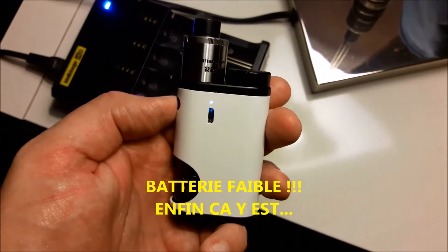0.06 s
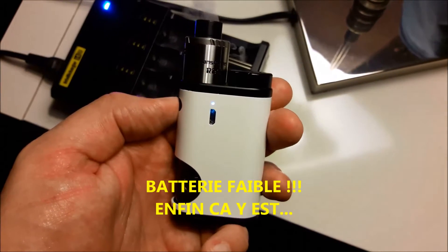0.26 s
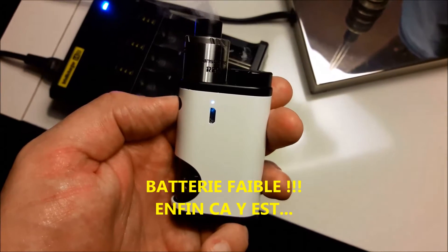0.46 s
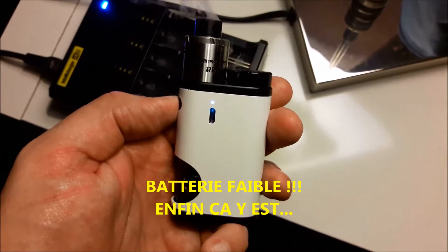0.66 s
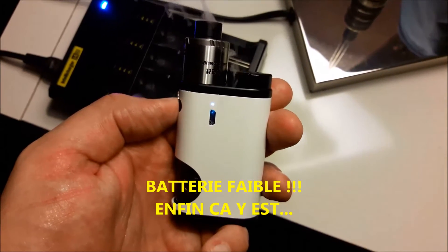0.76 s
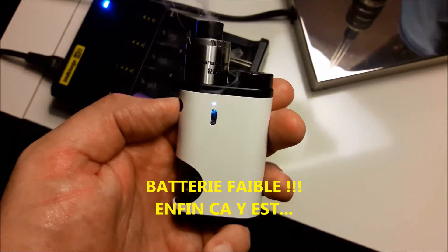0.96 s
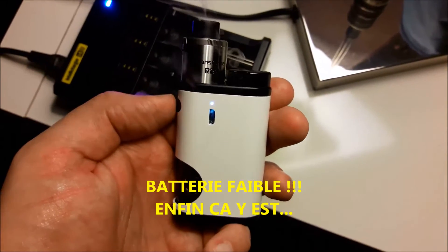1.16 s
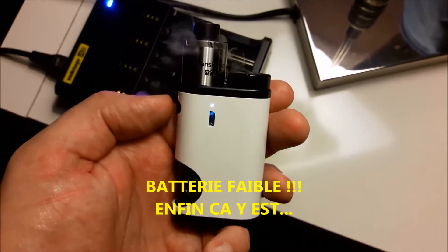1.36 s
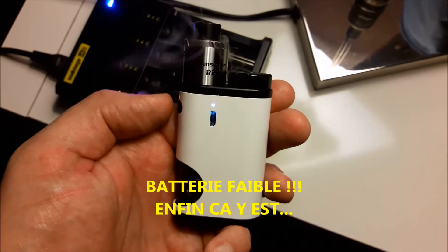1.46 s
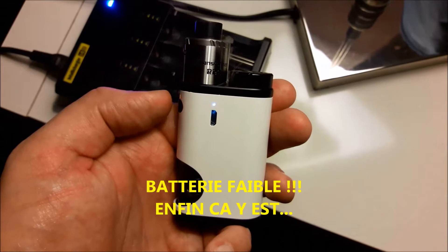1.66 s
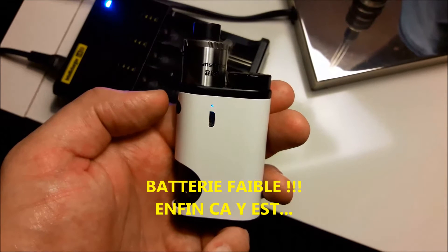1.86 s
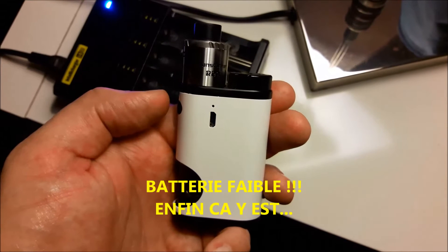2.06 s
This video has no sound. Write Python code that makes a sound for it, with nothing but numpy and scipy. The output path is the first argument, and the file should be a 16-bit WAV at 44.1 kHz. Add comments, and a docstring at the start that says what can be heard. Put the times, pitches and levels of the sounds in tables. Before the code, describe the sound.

Close crackling hiss and sharp pops from a vape's wet coil, fading into a quiet room.

```python
"""A small vaping device fires its wet coil, held over a desk close to the microphone in a quiet room.
First come a few pops as bubbles burst. Within a third of a second the boiling liquid swells into a
fine crackle and hiss, with spits of spray and sharp pops, the sharpest at 0.4 s. The device and nearby
reflections colour all of it. After one second the coil cools and the sizzle dies away.
Faint whistles sound in the last of the hiss, leaving the room's low hum."""
import sys
import numpy as np
from scipy import signal
from scipy.fft import rfft, irfft
from scipy.io import wavfile
from scipy.ndimage import uniform_filter1d

SR = 44100
rng = np.random.default_rng(int(sys.argv[2]) if len(sys.argv) > 2 else 0)


def unload_wav(signal):
    """Save mono or channel-first audio to the path in sys.argv[1] as 16-bit WAV at rate SR, clipped to [-1, 1]."""
    wavfile.write(
        sys.argv[1],
        SR,
        np.round(np.clip(np.atleast_2d(signal).T, -1, 1) * 32767).astype(np.int16),
    )


N = 92610  # 2.1 seconds
TIME = np.arange(N) / SR


def gain(db):
    """Turns decibels into a number to multiply by."""
    return 10 ** (np.asarray(db) / 20)


def normalise(x):
    """Scales a sound to an average (rms) size of 1."""
    return x / np.sqrt(np.mean(x ** 2) + 1e-20)


def look_up(points, hz, column=1):
    """Reads between a table's rows along a log-frequency axis."""
    table = np.array(points, float)
    return np.interp(np.log(hz + 1), np.log(table[:, 0] + 1), table[:, column])


def frequencies(size=4096):
    """The frequencies in the spectrum of a sound this many samples long."""
    return np.fft.rfftfreq(size, 1 / SR)


def click(db, delay_s=0):
    """The sharpest possible click with the given level at each frequency."""
    log_gain = np.log(gain(np.r_[db, db[-2:0:-1]]))
    spectrum = np.exp(np.conj(signal.hilbert(log_gain)))[:len(db)]
    return irfft(spectrum * np.exp(-2j * np.pi * frequencies() * delay_s))[:len(db)]


def through(x, response):
    """Filters a sound: every sample sets off a copy of the response."""
    return signal.oaconvolve(x, response)[:N]


def add(mix, start_s, sound):
    """Mixes a sound in at a given time."""
    part = mix[max(0, round(start_s * SR)):][:len(sound)]
    part += sound[:len(part)]


def noise_spectra(likeness):
    """Left and right noise spectra: unrelated at likeness 0, the same at 1."""
    left, other = rfft(rng.standard_normal((2, N)))
    return np.array([left, likeness * left + np.sqrt(1 - likeness ** 2) * other])


def narrow_noise(centre_hz, width_hz):
    """Two unrelated noises, each kept close to one frequency."""
    band = np.exp(-((frequencies(N) - centre_hz) / width_hz) ** 2)
    return normalise(irfft(rfft(rng.standard_normal((2, N))) * band, N))


# Tone colour of the room's noise: (frequency [Hz], relative level [dB])
NOISE_COLOUR = [(20, 2), (40, -37), (65, -7), (100, -5), (200, -5), (400, -7.5), (750, -11.5), (1400, -16),
                (2000, -11), (4000, -26), (6000, -27.5), (9500, -30.5), (12500, -29), (16000, -21)]
# How alike that noise is on the left and right: (frequency [Hz], likeness [0 to 1])
NOISE_LIKENESS = [(40, 0.22), (150, 0.65), (600, 0.15), (1500, 0), (3000, 0), (15000, 0)]
def room_noise(level_db=-63):
    """The soft, steady rush of a quiet room."""
    hz = frequencies(N)
    spectra = noise_spectra(look_up(NOISE_LIKENESS, hz)) * gain(look_up(NOISE_COLOUR, hz))
    return gain(level_db) * normalise(irfft(spectra, N))


# The tones in the room's hum: (pitch [Hz], level [dB])
HUM_TONES = [(100, -79), (141, -75), (594, -83)]
def hum(waver=0.25, waver_hz=5):
    """Low tones that waver a little in loudness and pitch."""
    out = np.zeros(N)
    for pitch, db in HUM_TONES:
        swell, drift = waver * narrow_noise(0, waver_hz)
        out += gain(db) * normalise((1 + swell) * np.sin(2 * np.pi * pitch * TIME + drift))
    return out


# Echoes off the hand, desk and nearby things: (delay [s], left level [dB], right level [dB])
NEAR_ECHOES = [(.0018, -13.5, -16.5), (.0030, -13, -21.5), (0.011, -24.5, -60), (0.0202, -35, -31)]
def room_echoes(stereo, tail_db=-12.5, tail_start_s=0.00251, fade_s=0.13):
    """Sound arrives directly, then as a few echoes and a faint tail that drops 60 dB in fade_s."""
    t, out = TIME[:SR // 2], []
    for side, channel in enumerate(stereo):
        tail = rng.standard_normal(len(t)) * gain(-60 * t / fade_s) * (t > tail_start_s)
        response = gain(tail_db) * tail / np.linalg.norm(tail)
        response[0] = 1  # the direct sound
        for delay, *db in NEAR_ECHOES:
            add(response, delay, gain([db[side]]))
        out.append(through(channel, response))
    return np.array(out)


# A thin whistle of escaping vapour: (time [s], pitch [Hz], level [dB])
VAPOUR_WHISTLE = [(1.66, 12200, -100), (1.70, 12300, -94), (1.76, 12700, -90), (1.82, 12000, -94),
                  (1.86, 11850, -87), (1.91, 11700, -100)]
# Faint tones as the sizzle ends: (pitch [Hz], width [Hz], level [dB], peak time [s], fade time [s])
FAINT_TONES = [(2278, 35, -75, 1.75, 0.8), (1855, 18, -78.5, 1.94, 0.43)]
def whistles(flutter_hz=50):
    """The last vapour whistles very high while two lower tones swell and fade."""
    times, pitches, levels = np.transpose(VAPOUR_WHISTLE)
    flutter = normalise(uniform_filter1d(rng.standard_normal(N), size=200))
    hz = np.interp(TIME, times, pitches) + flutter_hz * flutter
    loudness = np.interp(TIME, times, gain(levels), left=0, right=0)
    out = np.sqrt(2) * loudness * np.sin(2 * np.pi * np.cumsum(hz) / SR)
    for pitch, width, db, peak_s, fade_s in FAINT_TONES:
        swell = np.exp(-((TIME - peak_s) / fade_s) ** 2)
        out = out + gain(db) * swell * narrow_noise(pitch, width)
    return out


def microphone_bass_cut(stereo, cut_hz=118):
    """The microphone cuts the deep bass."""
    return signal.sosfilt(signal.butter(4, cut_hz, "high", fs=SR, output="sos"), stereo)


# Broad tone colour of the device: (frequency [Hz], left level [dB], right level [dB])
DEVICE_COLOUR = [(140,-13.5,-16), (516,-11.5,-16.5), (880,-11,-14), (1204,-10.5,-17), (1430,-3.5,-3),
                 (2160,-6.5,-5.5), (2180,-2.5,-4), (3130,-6,-4.5), (3760,-3,-0.5), (4110,-10.5,-3.5),
                 (4430,-19.5,-4), (4940,-11,-14.5), (5350,-19,-14), (7540,-19.5,-31), (7640,-16,-21),
                 (9170,-20,-26.5), (12160,-12.5,-18.5), (11600,-15,-5), (14100,-17,-32.5), (16100,-39,-7)]
# Where chamber and mouthpiece ring: (frequency [Hz], width [Hz], left boost [dB], right boost [dB])
DEVICE_RINGS = [(565, 40, 3, 3), (2997, 25, 6, 4), (3205, 55, 9, 6)]
# Narrow dips caused by reflections off the desk: (frequency [Hz], width [Hz], depth [dB])
LEFT_DIPS = [(659, 63, 14), (844, 33, 1.5), (1710, 79, 8.5), (2594, 36, 16)]
RIGHT_DIPS = [(736, 47, 16), (1603, 47, 26.6), (2337, 68, 22.5), (2711, 20.6, 14)]
def device_and_desk(stereo, right_delay_s=0.00014):
    """The device and nearby reflections colour the sound; the right side hears it slightly later."""
    hz, out = frequencies(), []
    for side, (dips, delay) in enumerate([(LEFT_DIPS, 0), (RIGHT_DIPS, right_delay_s)]):
        db = look_up(DEVICE_COLOUR, hz, column=side + 1)
        for centre, width, *boost in DEVICE_RINGS:
            db += boost[side] / (1 + ((hz - centre) / width) ** 2)
        for centre, width, depth in dips:
            db -= depth / (1 + ((hz - centre) / width) ** 2)
        out.append(through(stereo[side], click(db, delay)))
    return np.array(out)


def burst(bass_db, treble_db, delay_s=0, deep_db=0, edge_db=0):
    """The pressure pulse of one bursting bubble: big ones carry bass, sudden ones treble."""
    # (frequency [Hz], level compared with the middle range [dB])
    colour = [(190, min(bass_db + deep_db, 13)), (1500, bass_db), (3590, 0),
              (5360, edge_db), (9040, treble_db)]
    return click(look_up(colour, frequencies()), delay_s)


def hiss(alike_below_hz=7100):
    """Escaping vapour makes a smooth noise whose treble differs between left and right."""
    likeness = np.exp(-(frequencies(N) / alike_below_hz) ** 2)
    noise = irfft(noise_spectra(likeness), N)
    colour = burst(bass_db=-0.5, treble_db=2)
    return normalise(np.array([through(side, colour) for side in noise]))


def crackle(bursts_per_s=2600, kinds=7, colour_step_db=3.5, delay_step_s=0.000025):
    """Thousands of tiny bubbles burst all over the coil, so their left-right delay varies."""
    sizes = gain(-0.5 * np.minimum(rng.exponential(1, N), 2.6))
    bursting = rng.random(N) < bursts_per_s / SR
    clicks = sizes * bursting * rng.choice([-1, 1], N)
    kind, out = rng.integers(0, kinds, N), np.zeros((2, N))
    trebles = np.linspace(-2, 2, kinds)  # each kind has its own treble, bass and place, in steps
    basses, places = rng.permutation(trebles), rng.permutation(trebles)
    for k, (bass, treble, place) in enumerate(zip(basses, trebles, places)):
        bass_db = -3.5 + colour_step_db * bass
        treble_db = -4.5 + colour_step_db * treble
        for side, steps in enumerate([2, 2 + place]):
            pulse = burst(bass_db, treble_db, delay_step_s * steps)[:256]
            out[side] += through(clicks * (kind == k), pulse)
    return normalise(out)


# How hard the liquid boils: (time [s], level [dB])
BOIL_STRENGTH = [(0,-65.5), (0.03,-66), (0.06,-58), (0.13,-55.5), (0.19,-48.5), (0.26,-48.5), (0.33,-42.5),
                 (0.38,-46), (0.45,-42), (0.56,-44.5), (0.631,-44), (0.72,-46), (0.95,-43.5), (1.04,-48),
                 (1.15,-52), (1.22,-54.5), (1.43,-60.5), (1.75,-64), (2.1,-72)]
def sizzle(crackle_boost_db=8.5, hiss_boost_db=2.5):
    """Crackle and hiss grow and fade together with the boiling."""
    strength = gain(np.interp(TIME, *np.transpose(BOIL_STRENGTH)))
    return strength * (gain(crackle_boost_db) * crackle() + gain(hiss_boost_db) * hiss())


# Spits of liquid: (start [s], length [s], level [dB], bass boost [dB], treble boost [dB])
SPRAY_SPITS = [(0.2875, .015, -37.5, 6, -8), (0.3030, .006, -31, 9, 2), (0.3108, .008, -33, 2, 3),
               (0.392, .010, -38, 0, -6), (0.4025, .005, -37, -3, 2), (0.6175, .005, -37, 0, 2),
               (0.6265, .009, -38, -3, 5), (0.886, .006, -40, 3, 2)]
def spray():
    """Liquid spits out around some of the pops, in short puffs of noise that swell and fade."""
    out = np.zeros(N)
    for start, length, db, bass_db, treble_db in SPRAY_SPITS:
        noise = rng.standard_normal(SR // 10)[:int(length * SR)]
        puff = noise * np.hanning(len(noise)) ** 0.5
        add(out, start, gain(db) * np.convolve(puff, burst(bass_db, treble_db)))
    return out


def shrinking_bubble(start_s=0.34, length_s=0.00565, start_hz=1290, end_hz=3890, level_db=-26):
    """One bubble rings for a moment, its pitch rising as it shrinks."""
    out = np.zeros(N)
    hz = np.linspace(start_hz, end_hz, int(length_s * SR))
    tone = np.sin(2 * np.pi * np.cumsum(hz) / SR)
    add(out, start_s, gain(level_db) * np.hanning(len(hz)) ** 0.5 * tone)
    return out


# The larger bubbles bursting: (time [s], level [dB], bass boost [dB], treble boost [dB])
BUBBLE_POPS = [(0.0425,-1,-5,-14), (0.0630,-16,-4,-18), (0.0778,-13.5,-17,-7), (0.1014,-16,-1,-18),
               (0.1518,-6,-1,-21), (0.1664,-12.5,12,0), (0.2033,2,1,-11.5), (0.232,-7,2,-10),
               (0.281,-2.5,-2,-25), (0.3021,7,13.5,5), (0.3133,-5,0,5), (0.3554,-5,2,-14),
               (0.3864,-3,-2,-28), (0.393,-5,2,-20), (0.4016,18.5,-9.5,-12.5), (0.4319,-9.5,15.5,5),
               (0.49,-5,0.5,-8), (0.5134,-4,-3,-5), (0.5227,-8,14.5,-4), (0.545,-10.5,5,-11),
               (0.59,-5.5,1.5,-4), (0.5954,0,-27,-22), (0.6168,1.5,-1.5,-2.5), (0.6277,-6,-1,4.5),
               (0.6404,-8,3,-18), (0.73,4,-2,-32), (0.7393,-11,-2,-12), (0.7718,3.5,1.5,5),
               (0.813,-4,-1,-1), (0.816,-10.5,7,-21), (0.8657,-15,11,12), (0.882,-5,6,-3), (0.889,-10,7,4),
               (0.9066,-7.5,-2,-6), (0.9994,-10.5,7.5,-16), (1.0066,-12,3,1), (1.1003,-11,-0.5,-5)]
def pops(violent_above_db=12):
    """Each large bubble bursts in one pulse; a violent one cracks with a harder edge."""
    out = np.zeros(N)
    for start, db, bass_db, treble_db in BUBBLE_POPS:
        edge_db = 2 if db > violent_above_db else 0
        add(out, start, gain(db) * burst(bass_db, treble_db, deep_db=-2.5, edge_db=edge_db))
    return out


def scene():
    """The boiling coil in its room, joined by whistles, noise and hum."""
    boiling = pops() + shrinking_bubble() + spray() + sizzle()
    coil = microphone_bass_cut(device_and_desk(boiling))
    return room_echoes(coil) + whistles() + room_noise() + hum()


def record(dry):
    """Cuts away the very highest treble, above 15800 Hz."""
    low_pass = signal.firwin(255, 15800, window=("kaiser", 9), fs=SR)
    return signal.oaconvolve(dry, low_pass[None], "same")


dry = scene()
out = record(dry)
unload_wav(out)
```